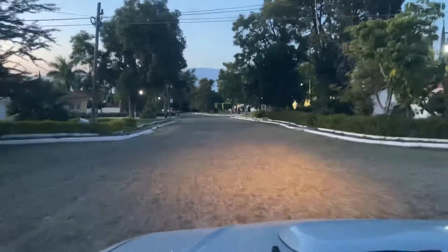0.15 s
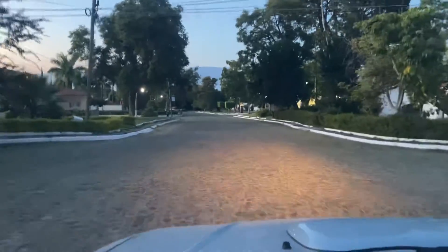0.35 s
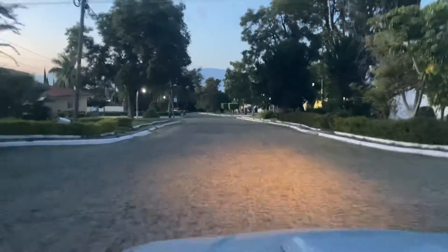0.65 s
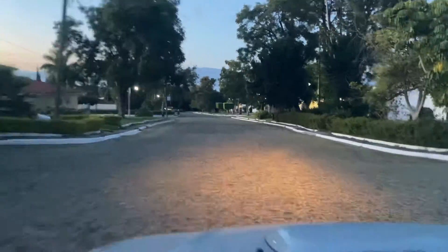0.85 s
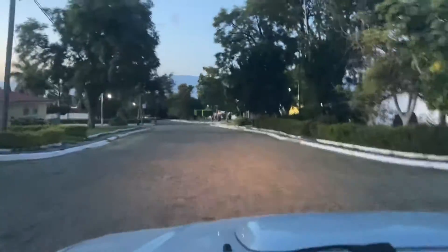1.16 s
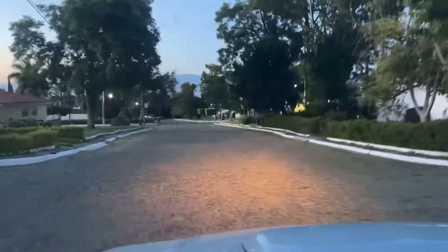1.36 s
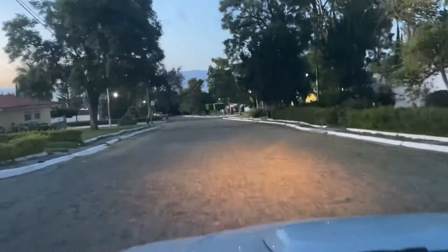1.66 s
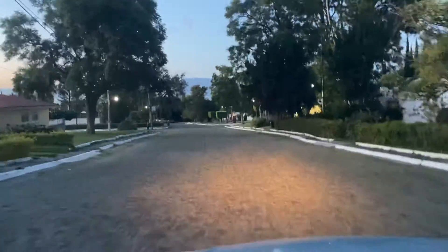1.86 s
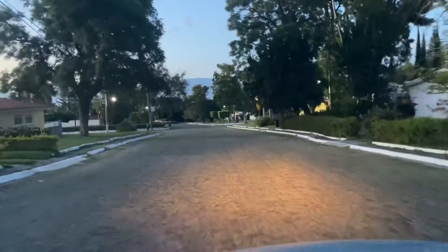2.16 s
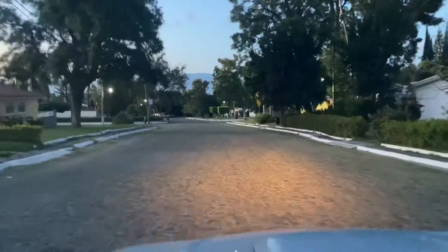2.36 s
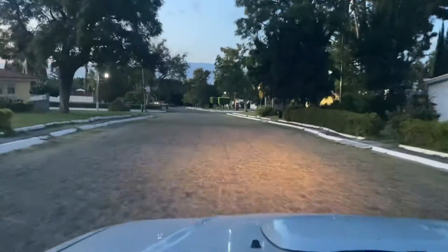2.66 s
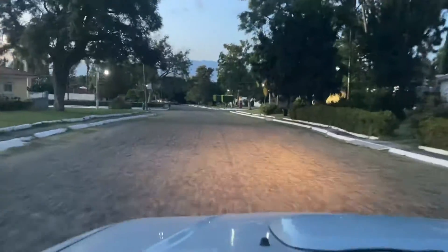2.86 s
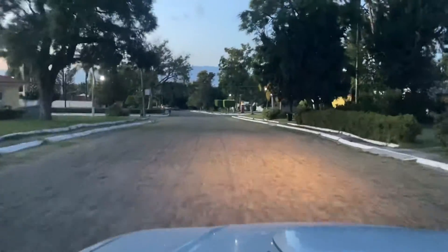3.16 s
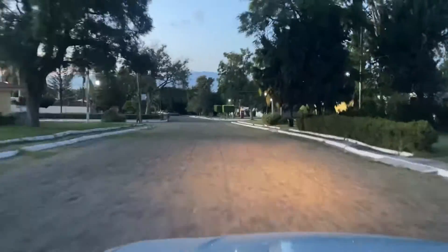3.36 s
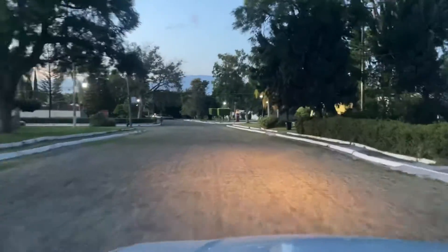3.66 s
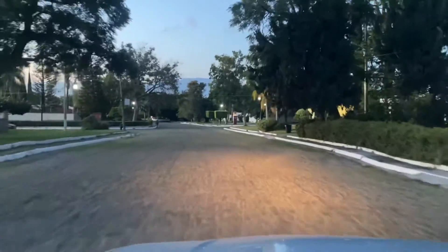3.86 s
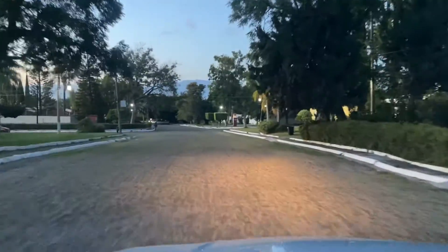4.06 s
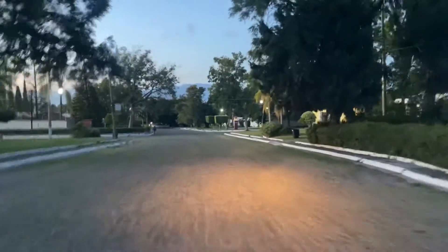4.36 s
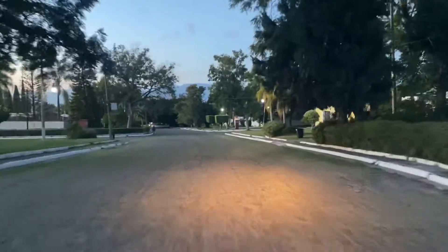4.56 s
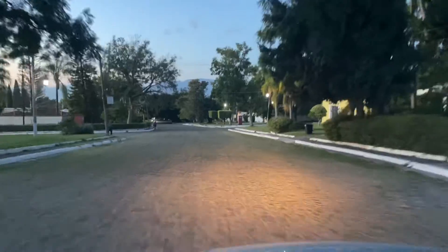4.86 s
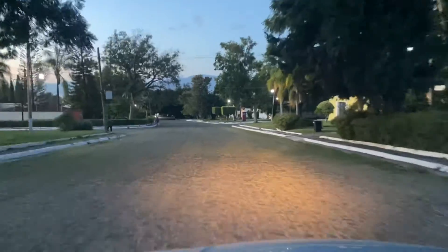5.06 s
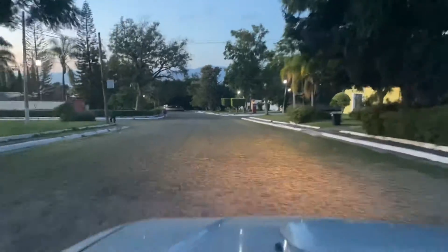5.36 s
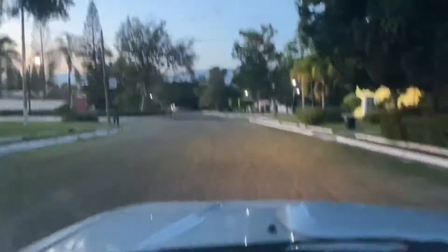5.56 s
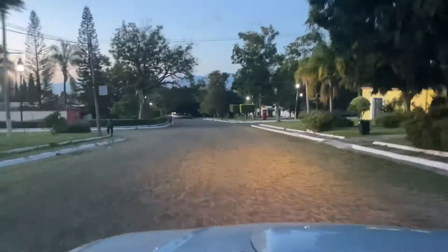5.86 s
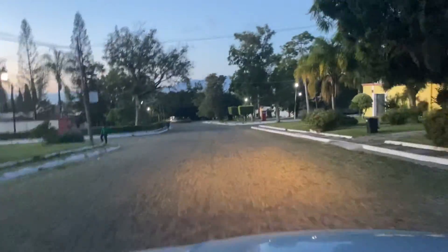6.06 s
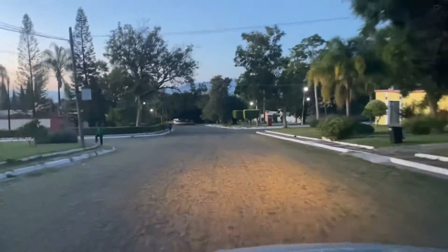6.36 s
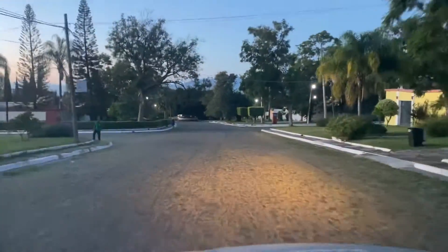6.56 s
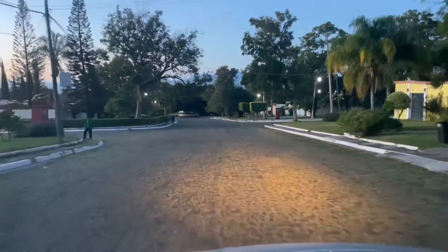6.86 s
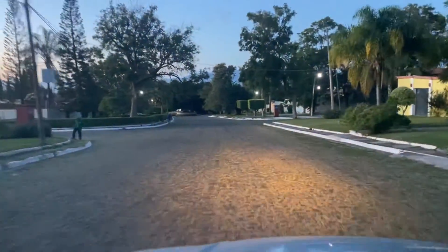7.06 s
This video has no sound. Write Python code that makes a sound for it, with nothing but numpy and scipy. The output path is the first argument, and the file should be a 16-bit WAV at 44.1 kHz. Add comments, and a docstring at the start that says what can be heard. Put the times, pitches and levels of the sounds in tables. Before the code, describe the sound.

Heard inside a slowly moving car: a soft, steady tyre and air rush at first, with faint scuffs and ticks. Near two seconds the wheels meet rough cobbles, bringing deep body boom, drumming tyres, irregular thumps and dry plastic rattles. The shaking eases after five seconds, then grows again towards the end. The close cabin microphone hears centred bass and slightly wider trim noise, without engine or speech.

```python
"""Car cabin on cobblestones

A car rolls slowly from a smoother stretch onto rough cobblestones, heard inside the cabin.
Random trains of stone blows are filtered into body boom, tyre drumming and tread slap.
Shaped noise bursts and ringing tones make the rattling plastic trim, creaks and chinking metal;
filtered noise makes the steady rush in the cabin, tyre roll and air.
"""
import sys
import numpy as np
from scipy import signal
from scipy.fft import rfft, irfft, next_fast_len
from scipy.io import wavfile
from scipy.ndimage import uniform_filter1d

SR = 44100
rng = np.random.default_rng(int(sys.argv[2]) if len(sys.argv) > 2 else 0)


def log_audio(samples):
    """Write samples as a 16-bit WAV file to the path given in sys.argv[1]."""
    # one column per channel
    frames = np.atleast_2d(samples).T
    # limit to full scale, then quantise
    limited = np.clip(frames, -1, 1)
    pcm = np.round(limited * 32767).astype(np.int16)
    wavfile.write(sys.argv[1], SR, pcm)


N = 318402
TIME = np.arange(N) / SR

# Most sounds have two rows: what both microphone ports share, and what sets them apart.
# Colour tables give relative levels; event levels are relative to the function's own level_db.


def amp(db):
    """Turns decibels into gain."""
    return 10 ** (np.asarray(db) / 20)


def unit(x):
    """Scales a signal to an rms of one."""
    return x / np.sqrt(np.mean(x ** 2) + 1e-20)


def read(points, hz):
    """Reads a table along a log-frequency axis."""
    f, value = np.transpose(points)
    return np.interp(np.log(hz + 1), np.log(f + 1), value)


def tilted(points, db_per_octave, pivot_hz):
    """Makes a colour brighter or duller by turning its spectrum about a pivot."""
    return [(f, level + db_per_octave * np.log2(f / pivot_hz)) for f, level in points]


def add(mix, s, sound):
    """Lays a sound into the mix at time s."""
    part = mix[:, max(round(s * SR), 0):][:, :sound.shape[-1]]
    part += sound[..., :part.shape[1]]


def colour(x, points, skirt_db=45):
    """Filters by a spectrum that falls by skirt_db per octave more beyond its ends."""
    size = x.shape[-1]
    hz = abs(np.fft.fftfreq(size, 1 / SR)) + 1
    octaves_out = abs(np.log2(hz / np.clip(hz, points[0][0], points[-1][0])))
    log_gain = np.log(amp(np.maximum(read(points, hz) - skirt_db * octaves_out, -110)))
    # minimum phase: the ringing follows each blow, never precedes it
    response = np.exp(np.conj(signal.hilbert(log_gain)))[:size // 2 + 1]
    return unit(irfft(rfft(x) * response, size))


def steadied(x, span):
    """Evens out swells slower than span seconds."""
    size = max(int(span * SR), 2)
    power = uniform_filter1d(uniform_filter1d(x ** 2, size), size)
    return x / np.sqrt(abs(power) + 1e-9)


def wavering(low_hz, high_hz, count):
    """An irregular slow wave: sines of many rates with random starting points."""
    rates = np.geomspace(low_hz, high_hz, count)
    return unit(sum(np.sin(2 * np.pi * (hz * TIME + rng.random())) for hz in rates))


def burst(t60, rise):
    """A contact and its dense cabin reflections: noise that jumps up and dies by 60 dB in t60 s."""
    t = np.arange(8192) / SR
    return rng.standard_normal((2, len(t))) * (1 - np.exp(-t / rise)) * amp(-60 * t / t60)


def ring(x, hz, width):
    """One resonance of gain one, width Hz wide."""
    return signal.lfilter(*signal.iirpeak(min(hz, .45 * SR), hz / width, fs=SR), x)


def peaked(x, db):
    """Scales a burst so that the rms of its loudest 3 ms is half of amp(db)."""
    return x * amp(db) / np.sqrt(uniform_filter1d((x ** 2).mean(0), 128).max()) / 2


def blows(per_s, spread_db):
    """Two random trains of impacts, mostly small and a few large."""
    size = amp(spread_db * np.minimum(rng.exponential(1, (2, N)), 4))
    happens = rng.random((2, N)) < per_s / SR
    return size * rng.choice([-1, 1], (2, N)) * happens


def stones(per_s, spread_db, rear=0.68, axle_lag_s=.37):
    """Each stone strikes a front tyre and then, a wheelbase later, a rear one."""
    front = blows(per_s, spread_db)
    # the rear tyre never meets a stone quite the same way
    met_again = front * rng.standard_normal(N)
    return front + rear * np.roll(met_again, int(axle_lag_s * SR), axis=1)


def rattle(modes, per_s, spread_db, sharpness):
    """Each loose part is tapped at its own random moments and rings at its own pitch."""
    out = np.zeros((2, N))
    for hz, db, t60 in modes:
        taps, width = blows(per_s, spread_db)[:1], hz / sharpness
        tone = ring(ring(burst(t60, rise=0.0013), hz, width), hz, width)
        out += amp(db) * unit(signal.oaconvolve(taps, tone, axes=1)[:, :N])
    return unit(out)


# colour of the steady rush in the cabin: f/Hz, level/dB (per Hz)
RUSH_COLOUR = [(130, -2.5), (230, -7), (320, 3), (420, 1), (540, -1), (620, -1), (695, -19.5), (790, -3.5),
               (1060, -4.5), (1200, -16.5), (1320, -10), (1540, -12), (1900, -30), (2350, -22.5),
               (2900, -40.5)]
# colour of the thin hiss above it: f/Hz, level/dB (per Hz)
HISS_COLOUR = [(1500, -33), (3000, -1.5), (7800, -2.5), (8050, 12), (9200, 3.5), (10200, 5.5), (11000, 3.5),
               (12300, 0), (13200, -3), (15700, -14)]


def cabin_rush(rush_db=-52.5, hiss_db=-71.0, waver_db=1.9):
    """Tyre roll and air: filtered noise that wavers a little, with a faint high hiss above it."""
    rush, hiss = rng.standard_normal((2, 2, N))
    waver = wavering(3, 30, 16)
    rush = colour(rush, RUSH_COLOUR) * amp(rush_db + waver_db * waver)
    return rush + colour(hiss, HISS_COLOUR) * amp(hiss_db)


# how rough the paving under the wheels is, 0 dB on ordinary cobbles: t/s, level/dB
ROUGHNESS = [(0.0, -19.5), (0.6, -23), (1.15, -19), (1.37, -20.5), (1.52, -12), (1.72, -11.5), (1.85, -0.5),
             (2.3, -1.2), (2.7, -0.5), (2.93, 4), (3.02, 0), (3.1, 3), (3.22, 2), (3.5, -1.5), (3.68, -1),
             (3.81, 4), (4.07, 5), (4.55, 0.5), (4.7, -2), (4.95, -2), (5.35, -8), (5.62, -8), (5.86, -12),
             (6.02, -10), (6.19, -4), (6.48, -5), (6.58, 1.0), (6.84, 5), (7.22, 5)]


def following_road(cobbles_db, growth):
    """A level in dB over time: cobbles_db on ordinary cobbles, plus growth dB per dB of shaking."""
    return cobbles_db + growth * np.interp(TIME, *np.transpose(ROUGHNESS))


# a wheel drops into a deep joint: t/s, level/dB
DEEP_JOINTS = [(0.04, -38), (0.49, -46), (0.6, -39), (0.874, -37), (1.03, -36), (1.168, -33.5),
               (1.465, -26), (1.63, -38), (1.885, -21), (2.13, -22), (2.255, -14.5), (2.455, -18.5),
               (2.775, -17.5), (2.925, -26), (3.125, -15), (3.25, -15), (3.395, -16.5), (3.49, -22),
               (3.59, -19.5), (3.65, -17), (3.88, -17), (3.96, -19), (4.04, -12.5), (4.19, -30),
               (4.43, -27), (4.52, -21), (4.66, -19.5), (4.76, -26), (4.86, -22), (5.05, -39),
               (5.255, -20.5), (5.37, -30), (5.53, -23.5), (5.607, -30), (5.7, -28), (5.97, -30),
               (6.165, -18.5), (6.28, -22.5), (6.68, -27), (6.817, -24), (6.91, -13.5), (7.03, -18),
               (7.16, -16.5)]


def shudder(level_db=-2, t60=0.28, rise_s=0.0086):
    """How hard the body shudders: each deep joint swells the shaking, which then dies away."""
    power, t = np.zeros((1, N)), np.arange(SR // 2) / SR
    swell = amp(level_db - 60 * t / t60) * (1 - np.exp(-t / rise_s))
    for s, db in DEEP_JOINTS:
        add(power, s, (swell * amp(db)) ** 2)
    return np.sqrt(power[0])


# colour of the booming body: f/Hz, level/dB (per Hz)
BOOM_COLOUR = [(20, -20), (33, -9.5), (42, -3), (52, -1.5), (61, 6), (69, -3), (78, 1.5), (90, -11)]
# colour of the drumming tyres: f/Hz, level/dB (per Hz)
DRUM_COLOUR = [(88, -4.5), (110, 1.5), (135, -0.5), (175, -3.5), (205, -1), (235, -8.5), (255, -7),
               (285, -11.5), (340, -11.5), (430, -20)]


def rumble(drum_shudder_db=-13):
    """Stones keep the body booming without a break and drum on the tyres; deep joints swell both."""
    boom_level = amp(following_road(-30, growth=0.8))
    drum_level = amp(following_road(-34, growth=1))
    swell = shudder()
    boom = steadied(colour(stones(per_s=700, spread_db=1), BOOM_COLOUR, skirt_db=54), span=0.055)
    drum = steadied(colour(stones(per_s=700, spread_db=1.5), DRUM_COLOUR, skirt_db=69), span=0.14)
    # hypot adds the powers of the steady shaking and the swell
    boom = boom * np.hypot(boom_level, swell)
    return boom + drum * np.hypot(drum_level, swell * amp(drum_shudder_db))


# colour of the slapping tread: f/Hz, level/dB (per Hz)
TREAD_COLOUR = [(240, -34.5), (400, -3), (514, 0), (700, -9), (873, -7.5), (1070, -21), (1160, -14.5),
                (1360, -26), (1640, -29), (1800, -25), (2340, -56), (3960, -120)]


def slap(gain_db_per_s=0.46):
    """The tread blocks patter on the edges of the stones, louder as the car gathers speed."""
    patter = steadied(colour(stones(per_s=600, spread_db=2.5), TREAD_COLOUR), span=0.8)
    level_db = following_road(-46, growth=0.71) + gain_db_per_s * (TIME - TIME.mean())
    return patter * amp(level_db)


# colour of the plastic trim: f/Hz, level/dB (per Hz)
TRIM_COLOUR = [(900, -21), (1400, -1.5), (2000, -1.5), (2250, -3), (2420, -2), (2600, -2.5), (2850, -2.5),
               (3800, -7.5), (4030, -6.5), (4300, -10), (6000, -13.5), (7000, -12.5), (9000, -24.5),
               (15000, -40.5)]


def grit(low_hz=1150, high_hz=4600, t60=0.042, count=10):
    """Small clips and fittings, each giving short dry knocks at a pitch of its own."""
    pitches = np.geomspace(low_hz, high_hz, count) * rng.uniform(.96, 1.04, count)
    fittings = [(hz, read(TRIM_COLOUR, hz), t60) for hz in pitches]
    return steadied(rattle(fittings, per_s=16, spread_db=2.6, sharpness=10), span=0.23)


# pitches of the loose trim parts: f/Hz, level/dB, decay (t60)/s
TRIM_PARTS = [(1540, 2.5, 0.06), (1697, 3.5, 0.058), (2095, -6, .06), (2410, -1, 0.04), (2620, -6, 0.04),
              (2863, -1, 0.048), (3150, -3.5, 0.034), (3970, -18, 0.035)]


def chatter(per_s=260, spread_db=2.5, t60=0.09, bed=0.53, parts_db=-8, grit_db=-4):
    """Many tiny trim contacts scatter round the cabin, with ringing parts and gritty little knocks."""
    t = np.arange(SR // 8) / SR
    # power falls with twice the decibels in amp()
    power = signal.oaconvolve(blows(per_s, spread_db)[0] ** 2, amp(-120 * t / t60))[:N]
    grain = np.sqrt(abs(power / power.mean() + bed))  # bed: a constant share under the contacts
    contacts = steadied(colour(grain * rng.standard_normal((2, N)), TRIM_COLOUR), span=0.23)
    parts = steadied(rattle(TRIM_PARTS, per_s=18, spread_db=2.4, sharpness=36), span=0.27)
    together = unit(contacts + parts * amp(parts_db) + grit() * amp(grit_db))
    return together * amp(following_road(-58.5, growth=1.08))


# pitches of small loose metal: f/Hz, level/dB, decay (t60)/s
LOOSE_METAL = [(7960, -6, 0.031), (10440, -8, .06), (10350, 14, 0.02), (10460, -3, 0.054),
               (11400, -17, .06), (14550, -9, .05)]


def jingle(level_db=-83, clump_db=5):
    """Small loose metal is tapped at random and rings, swelling in irregular flurries."""
    flurry = wavering(.7, 6, 12)
    shaken = rattle(LOOSE_METAL, per_s=14, spread_db=2.5, sharpness=16)
    return unit(shaken * amp(clump_db * np.minimum(flurry, 1))) * amp(level_db)


# a tyre scuffs over a proud stone: t/s, level/dB, brightness/(dB per octave), decay (t60)/s
SCUFF_EVENTS = [(0.055, -50, -1, .1), (0.125, -52, 5, .08), (0.29, -43.5, -1, 0.15),
                (0.333, -46.5, 2, 0.088), (0.71, -44.5, 0, .11), (0.842, -42, -2, 0.081),
                (0.887, -44, 1.5, .12), (1.112, -43, 1, .1), (1.154, -38, -3.5, .1), (1.294, -45, 2, .11),
                (1.347, -49, 7.5, 0.098), (2.753, -44, -5, .1), (2.884, -47, 0, .1), (2.937, -35, -2, .1),
                (3.19, -35.5, -1, .14), (3.215, -39, -4, .14), (3.868, -35, -6, .14), (3.97, -39, -4, .12),
                (4.527, -35, -2, 0.1), (5.1, -45, 3.5, .15), (5.15, -44, -4, 0.17), (5.668, -41.5, -3, .12),
                (5.743, -41.5, 3, 0.13), (5.885, -45, 0, .12), (6.544, -37, -3.5, 0.13),
                (6.83, -42, 5, 0.13), (6.99, -35.5, 2, 0.16)]
# colour of a scuff: f/Hz, level/dB (per Hz)
SCUFF_COLOUR = [(250, -15), (520, 7), (690, -8), (850, 3.5), (1100, -4), (1220, -11.5), (1500, -4.5),
                (1900, -19), (2350, -14.5), (3200, -38.5)]


def scuffs(level_db=1.0, rise=0.0038):
    """Soft brushes of rubber, dulled by the body; each has its own brightness and decay."""
    out = np.zeros((2, N))
    for s, db, tilt_db, t60 in SCUFF_EVENTS:
        brush = colour(burst(t60, rise), tilted(SCUFF_COLOUR, tilt_db, 800))
        add(out, s, peaked(brush, db + level_db))
    return out


# one small piece of metal chinks: t/s, level/dB, decay (t60)/s
CHINK_EVENTS = [(0.298, -55, 0.11), (0.5, -59, .05), (0.785, -57, .05), (0.956, -59, .05),
                (1.065, -62, .05), (1.625, -59, .05), (1.673, -58, .05), (1.978, -57, .04),
                (2.075, -57, .06), (2.215, -55, .04), (2.336, -60, .05), (2.413, -48, 0.098),
                (2.506, -59, .04), (2.536, -54, .06), (2.596, -54, .05), (2.612, -57, .04),
                (2.649, -57, .035), (2.71, -61, .06), (3.034, -52, 0.097), (3.14, -60, .05),
                (4.032, -60, .05), (5.971, -55, .06), (6.187, -60, .06), (6.322, -55, .06),
                (6.445, -62, .05), (6.552, -58, .05), (6.792, -58, .07)]
# what that piece rings with: f/Hz, level/dB
CHINK_MODES = [(9880, -3), (10090, 1), (10430, -2), (10910, -13), (14600, -16)]


def chinks(rise=0.00093, vary_db=3, level_db=1):
    """A piece of metal rings; every touch shifts its pitch a little and rebalances its modes."""
    out, t = np.zeros((2, N)), np.arange(SR // 8) / SR
    for s, db, t60 in CHINK_EVENTS:
        detune = 1 + .012 * rng.standard_normal()
        tone = np.zeros((2, len(t)))
        for hz, level in CHINK_MODES:
            gain = amp(level + vary_db * rng.standard_normal())
            tone += gain * np.sin(2 * np.pi * (hz * detune * t + rng.random((2, 1))))
        tone *= (1 - np.exp(-t / rise)) * amp(-60 * t / t60)
        add(out, s, peaked(tone, db + level_db))
    return out


# loose trim knocks: t/s, level/dB, ring f/Hz, brightness/(dB per octave), decay (t60)/s
KNOCK_EVENTS = [(0.333, -58, 2400, 3, .06), (1.54, -51.5, 5000, 2, .07), (1.575, -47.5, 2400, -11, 0.077),
                (1.64, -63, 2600, 4, .09), (1.72, -58, 2400, -2, .09), (1.796, -49, 1750, 6.5, 0.096),
                (1.825, -48, 3100, 2, .08), (1.848, -46, 2415, -3, .06), (1.928, -39.5, 2470, -1, .07),
                (1.985, -48, 2400, -1, .05), (2.018, -40.5, 2300, 4.5, .08), (2.125, -52, 2870, -5, .07),
                (2.185, -48, 1950, 1, .05), (2.228, -52, 3700, 7, .06), (2.285, -51, 2900, 3, .08),
                (2.33, -52, 3500, 1, .04), (2.411, -39.5, 1680, 1, .04), (2.424, -42, 7000, 5, 0.03),
                (2.443, -42, 1640, 6, 0.036), (2.461, -44, 3900, 1, .05), (2.504, -45.5, 7300, 3, .04),
                (2.521, -42, 3100, 3.5, .05), (2.549, -43, 2840, 3.5, 0.067), (2.58, -48, 2600, 2, .06),
                (2.779, -57, 5800, 4, .025), (2.824, -51, 2820, 5, 0.037), (2.848, -38.5, 2080, 2.5, 0.053),
                (2.9, -48, 2080, 0, .09), (2.938, -31, 2080, 0, 0.088), (2.969, -41, 2400, -4, .08),
                (3.052, -40.5, 1500, 2.5, 0.043), (3.08, -46, 2080, -3, .07), (3.111, -52, 3210, -3, .04),
                (3.129, -44, 1500, 1, .05), (3.139, -44, 6900, 5, .04), (3.152, -41, 2870, 1, .05),
                (3.22, -41.5, 2415, 2, 0.083), (3.311, -42, 1950, 3, 0.043), (3.373, -47, 2400, 0, .08),
                (3.647, -42.5, 2415, -5, 0.085), (3.77, -41, 2870, -3, 0.087), (3.799, -37, 2820, .5, .07),
                (3.863, -33, 2080, 1, 0.089), (3.921, -44, 2220, 1, 0.048),
                (3.957, -36.5, 4050, -0.5, 0.056), (3.992, -45, 2415, -2, .07),
                (4.045, -38, 1700, -.5, 0.12), (4.106, -42, 2080, -2, .07), (4.16, -42, 4020, 4, .05),
                (4.221, -42, 2900, 1, .07), (4.245, -45, 3500, 2, .05), (4.34, -41.5, 2415, -.5, .09),
                (4.395, -39.5, 1950, 1.5, .07), (4.461, -39, 2415, -6, .06), (4.527, -45.5, 2400, 1, .07),
                (4.61, -47, 2900, -1, .07), (4.671, -38, 1600, -2.5, 0.051), (4.94, -40, 4600, 8, .06),
                (4.957, -46, 6900, 9, .07), (4.983, -47, 4200, 3, .03), (5.225, -46.5, 2500, 0, .09),
                (5.28, -51, 2500, 1, .07), (5.449, -45.5, 2415, -12, .07), (5.748, -46, 4730, 8, .065),
                (5.78, -52, 2600, -1, .06), (6.13, -50.5, 2600, -6, 0.13), (6.199, -47, 2600, -4, 0.077),
                (6.255, -55, 2400, -9, .07), (6.369, -48, 7000, 10, .06), (6.4, -51, 2500, 0, .07),
                (6.55, -48, 2400, 6, 0.082), (6.577, -45, 2415, 2, .06), (6.667, -42, 3210, -2, .05),
                (6.703, -37.5, 2360, -2, 0.043), (6.761, -35.5, 1990, 2, 0.052),
                (6.82, -32, 2830, 0.5, .06), (6.895, -39, 2415, -5, .05), (6.981, -35, 2600, -2, .05),
                (6.992, -32.5, 2340, -0.5, 0.07), (7.016, -39, 6800, 1, .05),
                (7.025, -37.5, 2390, .5, 0.058), (7.13, -42, 2080, -2, 0.067)]


def knocks(rise=0.0024, ring_width=260, ring_db=4.5, level_db=-2.5, buzz_db=2.0):
    """Loose panels tap and buzz against their seats; each has its own ring, brightness and decay."""
    out = np.zeros((2, N))
    for s, db, hz, tilt_db, t60 in KNOCK_EVENTS:
        hit = burst(t60, rise)
        buzz = unit(uniform_filter1d(rng.standard_normal(hit.shape[1]), size=70))
        x = colour(hit * amp(buzz_db * buzz), tilted(TRIM_COLOUR, tilt_db, 3000))
        x = x + (amp(ring_db) - 1) * ring(x, hz, ring_width)  # the panel's own pitch stands out
        add(out, s, peaked(x, db + level_db))
    return out


# a tyre strikes the edge of a high stone: t/s, level/dB, brightness/(dB per octave)
THUMP_EVENTS = [(0.334, -49, 0), (0.714, -47, 6), (0.888, -43, 7), (1.157, -38, 5), (1.296, -42, 3.5),
                (1.454, -38, -4), (1.526, -35, 2), (1.6, -40, 0), (1.664, -35, -3), (1.778, -33, -1),
                (1.843, -23, 0), (2.006, -26, 1), (2.022, -26, 0.5), (2.078, -24, -7.5), (2.261, -27, 0.5),
                (2.301, -29, -6), (2.485, -25, -4), (2.886, -28, -1), (2.904, -22.5, -3), (2.941, -24, 1),
                (2.956, -20.5, -2.5), (3.054, -24.5, -2), (3.204, -21.5, 1), (3.272, -28, -2.5),
                (3.378, -25, -5), (3.777, -17, -1.5), (3.81, -22.5, -1), (3.872, -21, -0.5),
                (3.925, -30, 0), (3.965, -24, 1), (4.047, -17, -1), (4.066, -25, 1), (4.104, -25, 2.5),
                (4.228, -29, -4), (4.354, -20, -3), (4.39, -23, 1), (4.562, -24, -8), (4.823, -26, -8.5),
                (4.955, -33, -4), (5.07, -28.5, 0), (5.238, -30.5, -4), (5.605, -32, -5), (6.056, -30, -1),
                (6.177, -26.5, -4), (6.555, -24.5, 2.5), (6.586, -24, -0.5), (6.766, -25, 2.5),
                (6.802, -19.5, 0.5), (6.821, -19, -0.5), (7.163, -19, -3)]
# colour of such a thump through the suspension: f/Hz, level/dB (per Hz)
THUMP_COLOUR = [(90, -9), (130, 4.5), (165, 2.5), (205, 1.5), (260, -4.5), (340, -5), (520, -10.5),
                (700, -18), (850, -13), (1200, -22.5)]


def thumps(level_db=-2.0, echo=0.074, t60=0.064, contact_s=0.0029):
    """The soft tyre gives one rounded push through the suspension, scattered briefly by the cabin."""
    out = np.zeros((2, N))
    blow = np.hanning(max(int(contact_s * SR), 3))
    for s, db, tilt_db in THUMP_EVENTS:
        push = echo * burst(t60, rise=0.0042)
        push[0, :len(blow)] += blow / blow.sum()
        x = colour(push, tilted(THUMP_COLOUR, tilt_db, 300), skirt_db=23)
        add(out, s, x / abs(x).max() * amp(db + level_db))
    return out


# thin ticks of plastic: t/s, level/dB
TICK_EVENTS = [(0.844, -51), (0.888, -55), (1.024, -55), (1.115, -52), (1.157, -46), (1.346, -37),
               (2.424, -51), (3.797, -51)]
# colour of a thin tick: f/Hz, level/dB (per Hz)
TICK_COLOUR = [(4500, -25), (6200, -12), (7400, -18), (8100, 0.5), (8900, 1), (9500, -2.5), (11000, -6),
               (11600, -7), (12400, -5), (13400, -15), (15500, -19)]


def ticks():
    """Thin plastic ticks close to the microphone: short bursts of mostly high noise."""
    out = np.zeros((2, N))
    for s, db in TICK_EVENTS:
        add(out, s, peaked(colour(burst(t60=0.067, rise=0.0011), TICK_COLOUR), db))
    return out


# plastic rubs on plastic and squeaks: t/s, level/dB, f/Hz, length/s
CREAK_EVENTS = [(1.815, -39.5, 1704, 0.031), (2.12, -48, 1605, .034), (2.323, -39.5, 1685, 0.015),
                (2.385, -41, 1680, .017), (2.412, -44, 1740, .012), (2.46, -34.5, 1700, 0.015),
                (2.552, -46, 1680, 0.011), (2.823, -39.5, 2790, 0.007), (3.465, -50, 3950, .007),
                (4.185, -39.5, 3970, .009), (5.984, -60, 4570, 0.0092), (6.036, -55, 2350, .012),
                (6.919, -46, 3500, .007), (6.984, -27.5, 2415, 0.009)]


def creaks(glide=0.024, jitter=0.051, overtone_db=-13, echo=0.056, level_db=-2.5):
    """Stick and slip: a rough, slightly rising tone as long as the rub lasts, smeared by the cabin."""
    out = np.zeros((2, N))
    for s, db, hz, length in CREAK_EVENTS:
        along = np.linspace(0, 1, int(length * SR))
        waver = unit(uniform_filter1d(rng.standard_normal((2, SR // 8)), size=30))[:, :len(along)]
        pitch = hz * (1 + glide * (along - .5) + jitter * waver)  # glide and jitter: shares of hz
        turn = 2 * np.pi * np.cumsum(pitch, axis=1) / SR
        tone = (np.sin(turn) + amp(overtone_db) * np.sin(2 * turn)) * np.sin(np.pi * along)
        cabin = echo * burst(t60=0.037, rise=0.0016)
        cabin[:, 0] += 1  # the direct sound
        add(out, s, peaked(signal.fftconvolve(tone, cabin, axes=1), db + level_db))
    return out


# level of an opposite-phase layer over time: t/s, level/dB
OPPOSITE_LEVEL = [(3.6, -65), (4.0, -60), (4.3, -26), (4.6, -18), (4.95, -9), (5.15, -42), (5.35, -62)]


def stereo_widening(patter, low_hz=500):
    """A stereo widening: high-passed patter added in opposite phase left and right."""
    high_pass = signal.butter(6, low_hz, "high", fs=SR, output="sos")
    upper = signal.sosfilt(high_pass, patter[1])
    wide = upper * amp(np.interp(TIME, *np.transpose(OPPOSITE_LEVEL)))
    return np.array([wide, -wide])


# colour of a sharp plastic snap: f/Hz, level/dB (per Hz)
SNAP_COLOUR = [(700, -10), (1400, -12), (1900, -4), (2300, -12), (2950, 7), (3450, 0), (3900, -12),
               (4500, -10), (4980, -5), (5650, -24), (7200, -18), (8300, -9), (9200, -20), (12500, -33)]
# what the snapping piece rings with: f/Hz, level/dB, decay (t60)/s
SNAP_MODES = [(2433, -7, .031), (2880, -2, 0.04), (3020, -4, 0.03), (3270, -4, 0.035), (5000, -7, .027)]


def snap(at_s=4.8665, crack_db=-27.5, ring_db=-35, cabin_db=-12):
    """One sharp snap of plastic close to the microphone: a noisy crack and a few dying tones."""
    out, t = np.zeros((2, N)), np.arange(SR // 8) / SR
    tone = sum(amp(db - 60 * t / t60) * np.sin(2 * np.pi * hz * t) for hz, db, t60 in SNAP_MODES)
    tone = tone * (1 - np.exp(-t / 0.001))
    crack = burst(t60=0.017, rise=0.0012) + amp(cabin_db) * burst(t60=0.048, rise=0.002)
    add(out, at_s, peaked(colour(crack, SNAP_COLOUR, skirt_db=13), crack_db))
    add(out[:1], at_s, peaked(tone[None], ring_db))  # the tones go to the shared row only
    return out


# how alike the two microphone ports hear, clipped to between -1 and 1: f/Hz, likeness
PORT_LIKENESS = [(700, 5), (1050, 1.04), (1350, 0.17), (2000, 0.5), (2800, 0.74), (5600, 0.58), (6700, 0.5),
                 (7200, 2), (9000, 10)]
# how far the left port leads: f/Hz, phase/rad
LEFT_LEAD = [(700, 0), (1200, .3), (2000, .1), (2900, .3), (5600, 0), (7400, -.1), (9000, -3.14),
             (11100, -6.28), (13200, -9.42), (15200, -12.57)]
# left minus right: f/Hz, level/dB
LEFT_LEAN = [(700, 0), (1500, 1), (5000, 3), (7000, 0.5), (12000, -.5)]


def ports(x):
    """Shared and unshared sound reach two close ports: mono bass, wide middle, delayed treble."""
    size = next_fast_len(N + SR)
    hz = np.fft.rfftfreq(size, 1 / SR)
    shared, apart = rfft(x, size)
    same = np.where(hz < PORT_LIKENESS[0][0], 1, np.clip(read(PORT_LIKENESS, hz), -1, 1))
    mid, side = shared * np.sqrt((1 + same) / 2), apart * np.sqrt((1 - same) / 2)
    lean = amp(read(LEFT_LEAN, hz) / 2)
    left = (mid + side) * lean
    right = (mid - side) / lean * np.exp(-1j * read(LEFT_LEAD, hz))
    return irfft(np.array([left, right]), size)[:, :N]


def scene():
    """Everything in the cabin, at the microphone, plus the stereo widening."""
    tread = slap()
    tyres = rumble() + tread + scuffs() + thumps()
    loose = chatter() + jingle() + chinks() + knocks() + ticks() + creaks() + snap()
    return ports(cabin_rush() + tyres + loose) + stereo_widening(tread)


def record(dry, low_hz=25, edge_hz=15750):
    """The recorder's low cut and band limit."""
    cut = signal.sosfilt(signal.butter(3, low_hz, "high", fs=SR, output="sos"), dry)
    band_limit = signal.firwin(511, edge_hz, window=("kaiser", 9), fs=SR)
    return signal.oaconvolve(cut, band_limit[None], "same")


dry = scene()
out = record(dry)
log_audio(out)
```